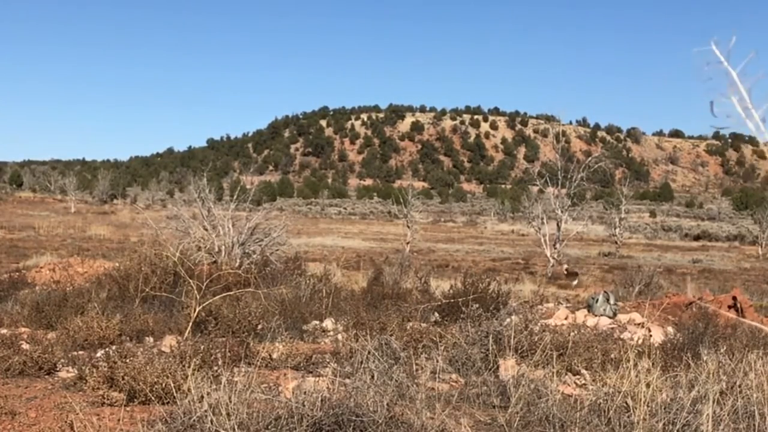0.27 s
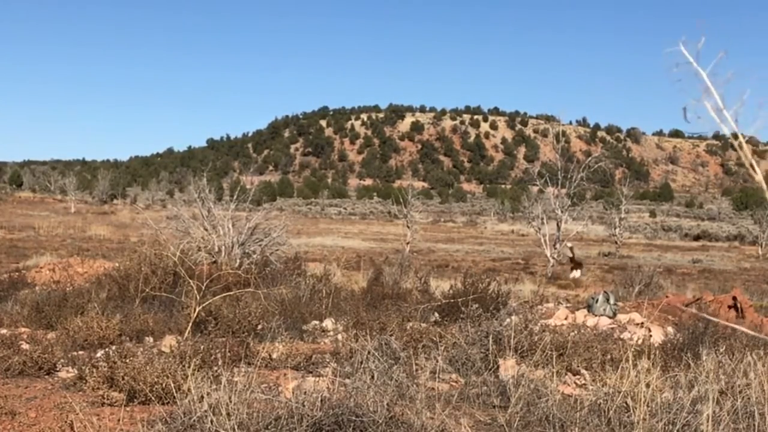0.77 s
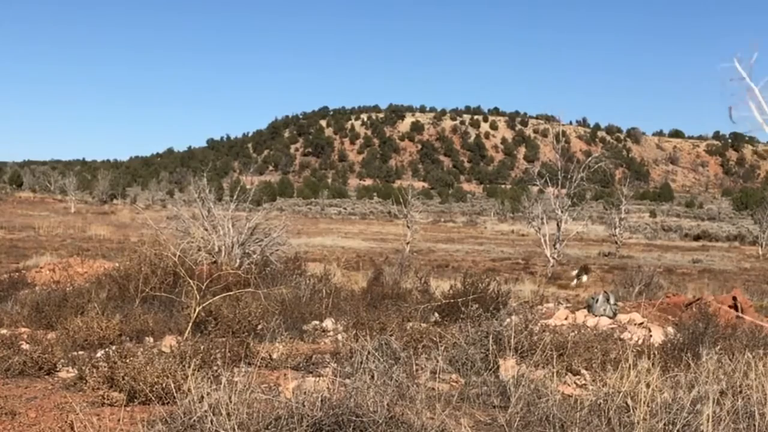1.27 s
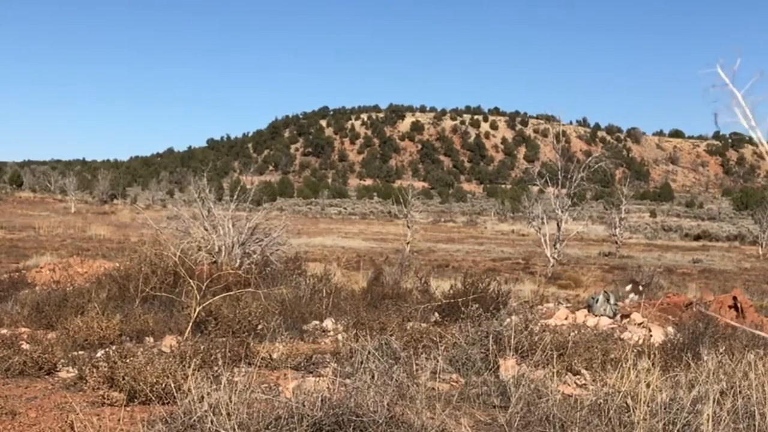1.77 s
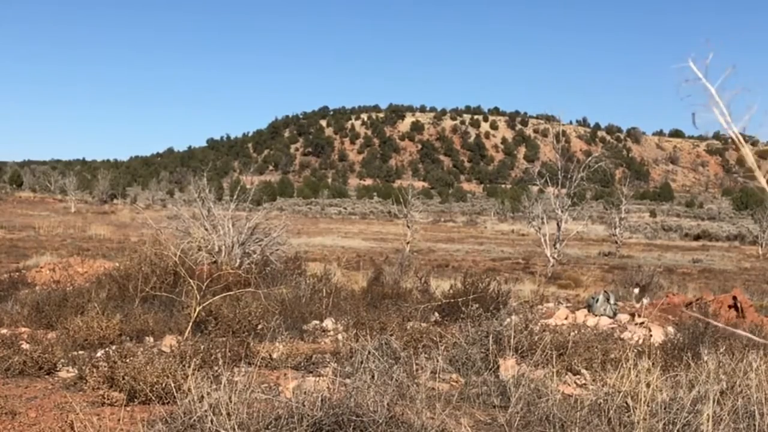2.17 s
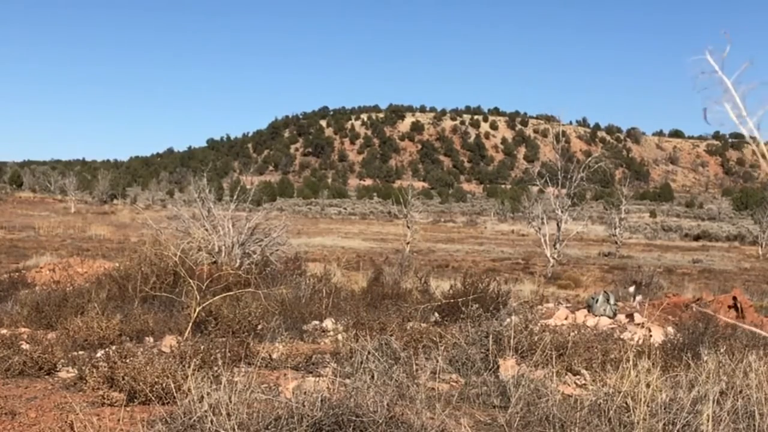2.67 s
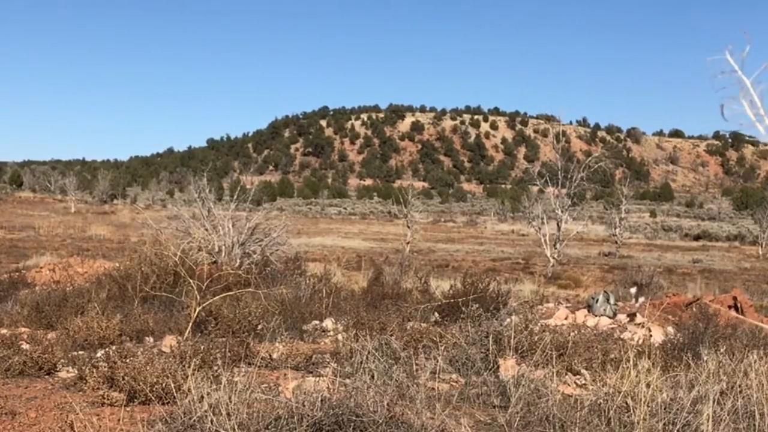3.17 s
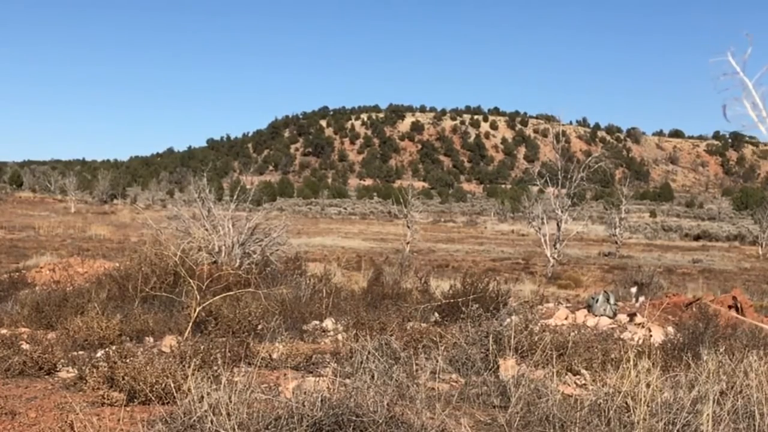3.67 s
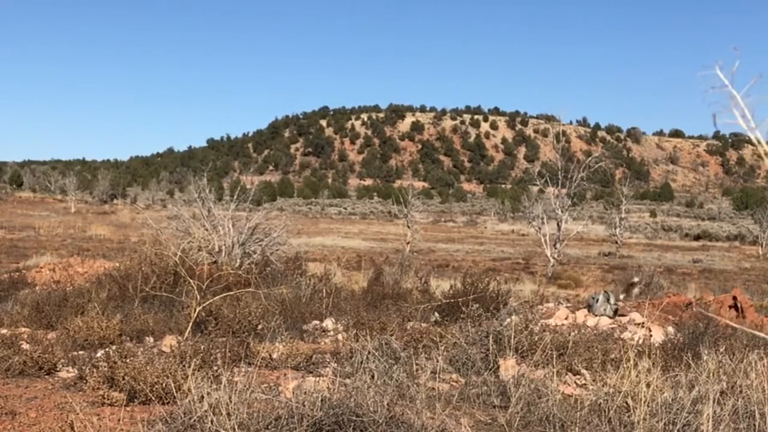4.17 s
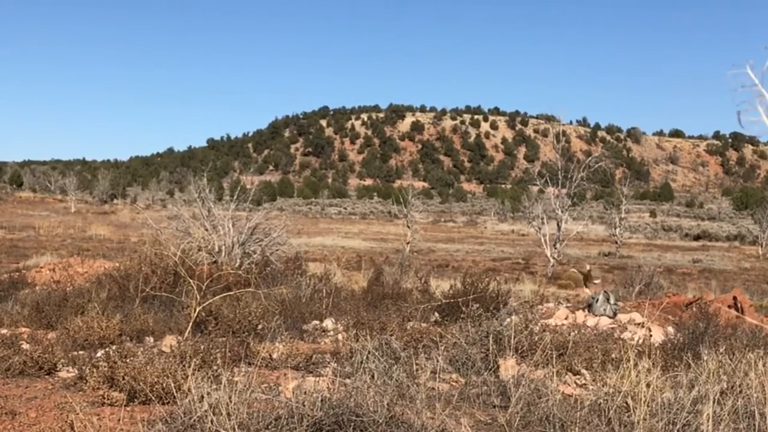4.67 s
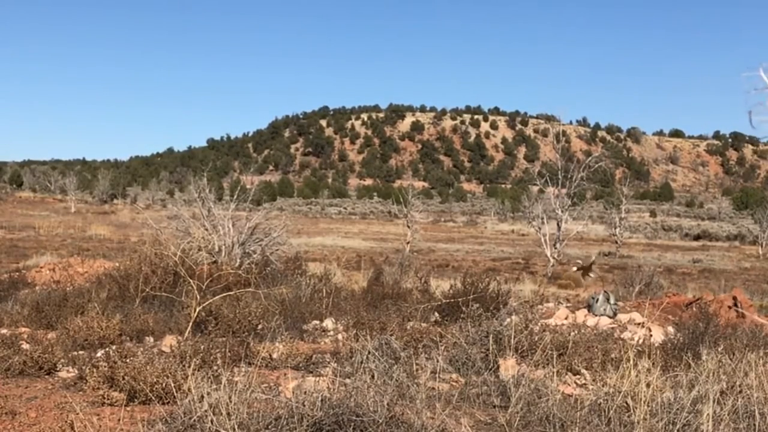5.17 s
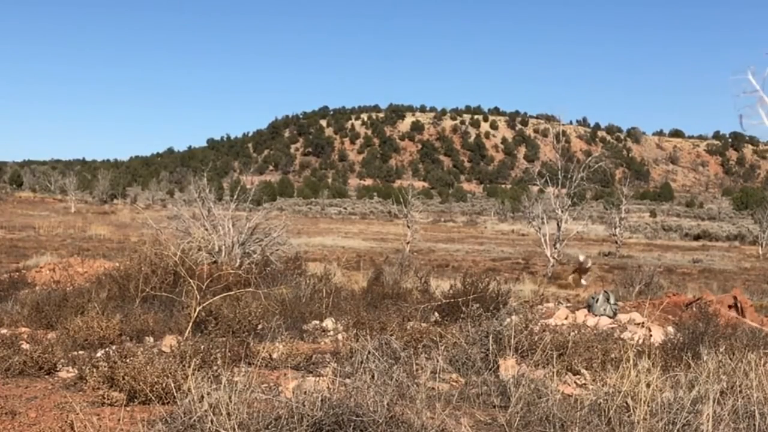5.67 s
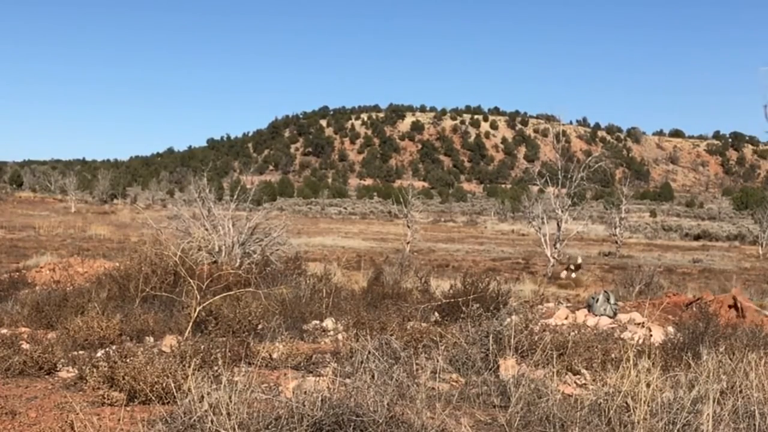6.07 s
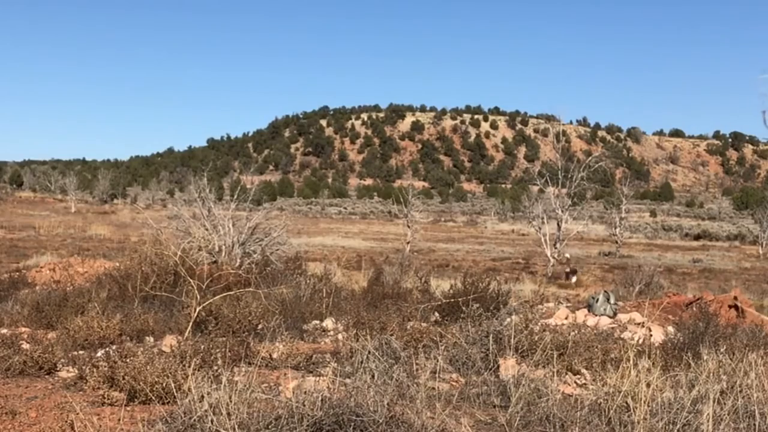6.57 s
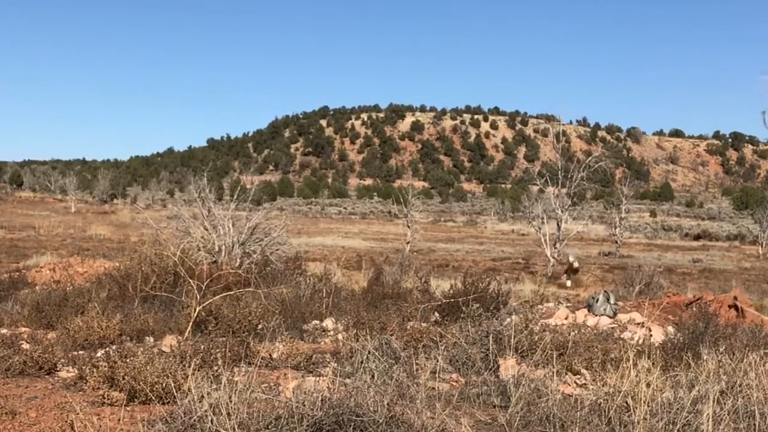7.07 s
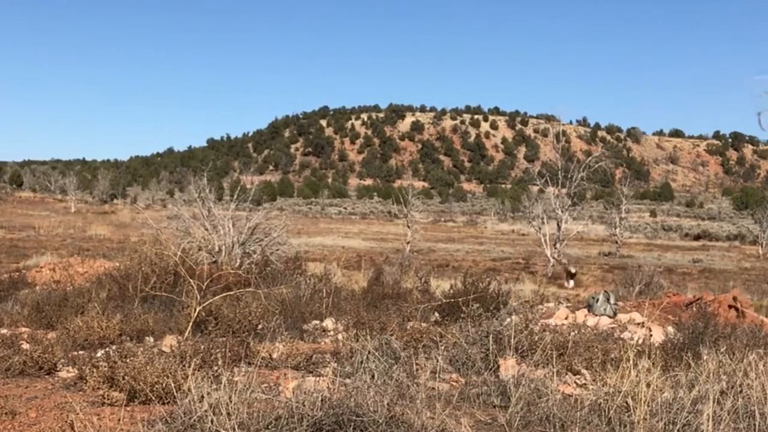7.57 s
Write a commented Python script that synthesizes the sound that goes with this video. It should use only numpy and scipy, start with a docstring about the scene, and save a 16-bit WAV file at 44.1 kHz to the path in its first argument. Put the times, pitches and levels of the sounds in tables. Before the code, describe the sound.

Coyotes bark roughly, yip and howl in open country while wind buffets the microphone.

```python
"""Open scrub with coyotes: one barks roughly and swells into three long howls, a second yips under it,
and others answer from far away. Their vocal folds make a clear note when they swing evenly and a
rough one when they flap unevenly. The sloping ground throws back a thin echo. Wind buffets the
microphone over a faint hiss, and something dry snaps right beside it."""
import sys
import numpy as np
from scipy import signal
from scipy.fft import rfft, irfft, next_fast_len
from scipy.io import wavfile
from scipy.ndimage import uniform_filter1d

SR = 44100
rng = np.random.default_rng(int(sys.argv[2]) if len(sys.argv) > 2 else 0)


def master(y):
    """Save y as 16-bit WAV."""
    cut = np.clip(np.atleast_2d(y).T, -1, 1)
    pcm = np.round(cut * 32767)  # scale
    wavfile.write(sys.argv[1], SR, pcm.astype(np.int16))


N = 345303
TIME = np.arange(N) / SR

# How a near and a far coyote's throat colour the voice: frequency_hz, gain_db
NEAR_THROAT = [(200, -41), (450, -28.5), (600, -12), (760, 12), (1050, 11), (1300, -2), (1600, 3.5),
               (1900, -14), (2250, -16), (2700, -31), (3350, -25.5), (4000, -47.5), (6700, -44),
               (10000, -69)]
DISTANT_THROAT = [(300, -37.5), (600, -7), (780, 9.5), (1100, -1.5), (1350, -14.5), (1650, -11),
                  (2200, -36.5), (3400, -33.5), (5000, -73), (9000, -45)]
# The tone of wind fluttering on the microphone: frequency_hz, gain_db
FLUTTER_COLOUR = [(60, -28.5), (110, 2.5), (150, 1), (220, -2.5), (320, -11), (450, -23.5), (700, -35),
                  (1200, -51.5), (3000, -84.5)]


def gain_of(db):
    """Turns decibels into a number to multiply by."""
    return 10 ** (np.asarray(db) / 20)


def evened(x):
    """Scales a signal to an average strength (rms) of 1."""
    return x / np.sqrt(np.mean(x ** 2) + 1e-20)


def read(points, hz):
    """Looks up a table's value at any frequency, on a log scale."""
    frequencies, values = np.transpose(points)
    return np.interp(np.log(hz + 1), np.log(frequencies + 1), values)


def follow(rows):
    """Turns timed rows into sample times and one curve for each other column."""
    times, *columns = np.transpose(rows)
    t = np.arange(times[0], times[-1], 1 / SR)
    return [t] + [np.interp(t, times, column) for column in columns]


def add(mix, start_s, sound):
    """Mixes a sound in at a given time."""
    part = mix[max(0, round(start_s * SR)):][:len(sound)]
    part += sound[:len(part)]


def coloured(x, colour):
    """Shapes a signal's lows and highs by a table, at strength 1."""
    size = next_fast_len(len(x))
    gains = gain_of(read(colour, np.fft.rfftfreq(size, 1 / SR)))
    return evened(irfft(rfft(x, size) * gains, size)[:len(x)])


def wander(t, rate_hz):
    """A smooth random wobble of strength 1, up to about the given rate."""
    size, coarse_sr = 2 ** 15, 4000
    hz = np.fft.rfftfreq(size, 1 / coarse_sr)
    slow = evened(irfft(rfft(rng.standard_normal(size)) / (1 + (hz / rate_hz) ** 4)))
    return np.interp(t * coarse_sr, np.arange(size), slow)


def fade(t, edge_s=0.0096):
    """A soft start and end for a sound."""
    return np.clip(np.minimum(t - t[0], t[-1] - t) / edge_s, 0, 1)


def around(peak_s, rise_s, fall_s):
    """A call's sample times and progress: -1 at the start, 0 at the peak, 1 at the end."""
    t = np.arange(peak_s - rise_s, peak_s + fall_s, 1 / SR)
    return t, (t - peak_s) / np.where(t < peak_s, rise_s, fall_s)


def noise(t):
    """White noise, one value for each sample time."""
    return rng.standard_normal(N)[:len(t)]


def eddies(colour, lumps=1):
    """The pressure of swirling air, held at an even strength."""
    pressure = coloured(noise(TIME) * lumps, colour)
    return pressure / np.sqrt(uniform_filter1d(pressure ** 2, size=3000))


def wind(flutter_db=-19, flutter_chop_db=4, chop_db=4.5, lumps_db=3):
    """Swirls push on the microphone; gusts swell over that push and break into lumpy flutter."""
    # The steady push: time_s, level_db
    steady_wind = [(0, -37), (.5, -40), (.9, -41.5), (1.3, -45.5), (1.65, -48), (2.3, -44), (3.1, -40),
                   (3.4, -45), (3.9, -48), (4.4, -43.5), (5, -46), (5.55, -49), (5.9, -57), (6.4, -55),
                   (6.9, -56.5), (7.3, -46), (7.5, -56), (7.83, -49)]
    # Gusts: peak_s, half_length_s, rumble_db, flutter_db
    gusts = [ (0.116, 0.027, -31.5, -38), (0.29, 0.044, -25, -23.5), (0.439, 0.077, -24.5, -38),
             (0.642, 0.019, -56, -39.5), (0.771, 0.0097, -52, -37), (0.95, 0.023, -29.5, -33),
             (1.051, 0.024, -26.5, -35.5), (1.769, 0.044, -43, -52.5), (2.218, 0.023, -23.5, -33),
             (2.38, 0.035, -35.5, -50), (2.566, 0.022, -36, -49), (2.927, 0.027, -35.5, -73),
             (4.061, 0.049, -38, -51.5), (4.205, .02, -30, -46.5), (4.481, 0.056, -29.5, -51.5),
             (4.784, 0.045, -24.5, -42), (5.45, 0.019, -32, -53.5), (6.058, 0.043, -35, -41.5),
             (6.594, 0.034, -42, -53.5), (7.03, 0.036, -27.5, -36), (7.146, 0.045, -29, -38.5), ]
    # The tone of the push, and of gusts, whose faster air sounds higher: frequency_hz, gain_db
    rumble_colour = [(10, -23), (25, -8), (45, 10), (70, 7.5), (115, -5), (150, -10.5), (250, -24),
                     (600, -77.5)]
    gust_colour = [(10, -36), (25, -20), (45, 3), (65, 4.5), (90, 6), (125, -1.5), (160, -9), (250, -30),
                   (600, -89.5)]
    push = gain_of(np.interp(TIME, *np.transpose(steady_wind)))
    shake = push * gain_of(flutter_db + flutter_chop_db * wander(TIME, 33))
    gusting = np.zeros(N)
    for peak_s, half_s, low_db, high_db in gusts:
        swell = np.exp(-np.minimum(((TIME - peak_s) / half_s) ** 2, 20))
        gusting += gain_of(low_db) * swell
        shake += gain_of(high_db) * swell
    rumble = eddies(rumble_colour) * gain_of(chop_db * wander(TIME, 36))  # single swirls chop it up
    flutter = eddies(FLUTTER_COLOUR, gain_of(lumps_db * wander(TIME, 44)))
    return push * rumble + gusting * eddies(gust_colour) + shake * flutter


def air_hiss(level_db=-67):
    """A faint, steady hiss behind everything."""
    # The tone of the hiss: frequency_hz, gain_db
    hiss_colour = [(180, -27), (300, -2), (511, -12), (700, -6), (898, -1), (1230, -9), (1380, -4),
                   (1480, -13), (1870, -19), (4290, -21), (4980, -23), (6280, -23), (10300, -26.5),
                   (11400, -24), (15900, -27.5)]
    return gain_of(level_db) * coloured(noise(TIME), hiss_colour)


def hoarse_voice(t, hz, level_db, rough, bright_db, throat, jitter, noisiness):
    """Vocal folds between a clear note (rough=0) and chaos (rough=1), heard through the throat."""
    wobble = 1 + (.006 + jitter * rough) * wander(t, 150)
    cycles = np.cumsum(uniform_filter1d(hz, size=400) * wobble) / SR
    # At high pitch the folds no longer close, and the overtones fade.
    falsetto = np.clip(np.log2(hz / 550), 0, 1)
    sizes = [gain_of(read(throat, k * hz) - 6 * falsetto * np.log2(k)) for k in range(1, 19)]
    folds = sum(size * np.cos(2 * np.pi * k * cycles + k * k) for k, size in enumerate(sizes, 1))
    folds /= np.sqrt(sum(size ** 2 for size in sizes) / 2)
    # Air escapes in one puff a cycle.
    puffs = coloured((0.17 + np.exp(-(cycles % 1) / 0.21)) * noise(t), throat)
    air_share = .01 + noisiness * rough ** 3
    voice = np.sqrt(1 - air_share) * folds + np.sqrt(air_share) * puffs
    # An open mouth lifts the bright part of the voice.
    mouth = signal.sosfiltfilt(signal.butter(3, [1250, 3700], "band", fs=SR, output="sos"), voice)
    voice += (gain_of(bright_db) - 1) * mouth
    voice /= np.sqrt(abs(uniform_filter1d(voice ** 2, size=900)) + 1e-9)  # even out the strength
    sputter_db = 3.8 * rough * wander(t, 58)  # rough folds also pulse unevenly
    return t[0], gain_of(level_db + sputter_db) * voice * fade(t)


def far_wail(bright_db_per_octave=22):
    """A long hoarse call far away; the mouth opens as the pitch climbs."""
    # The path of the wail: time_s, pitch_hz, level_db
    wail = [(0, 918, -50.5), (.1, 933, -55.5), (.2, 848, -52.5), (.39, 808.5, -63.5), (.47, 850, -37.5),
            (.53, 879, -40), (.59, 1100, -42), (.655, 1119, -50), (.71, 1011, -37.5), (.76, 889, -62),
            (.81, 852, -44.5), (.89, 772, -71)]
    t, hz, level_db = follow(wail)
    bright_db = bright_db_per_octave * np.log2(hz / hz.mean())
    return hoarse_voice(t, hz, level_db, rough=0.57, bright_db=bright_db,
                        throat=DISTANT_THROAT, jitter=.12, noisiness=.6)


def hillside_echo(calls, build_s=0.0031, bounce_db=-4):
    """The slope throws back a few clear bounces over a thin scatter from the scrub."""
    # How long the scatter takes to fall by 60 dB: frequency_hz, time_s
    ring_times = [(300, .4), (900, .7), (2200, .55), (5000, .3), (12000, .2)]
    # Single bounces off the slope: delay_s, relative_db
    bounces = [(.021, 2.5), (.047, -2), (.062, -4.5), (.093, -7.5), (.135, -24.5)]
    scatter = rng.standard_normal(SR) * (rng.random(SR) < .05) * (1 - np.exp(-TIME[:SR] / build_s))
    hz, t, bands = signal.stft(scatter, SR, nperseg=256)
    dying = gain_of(-60 * t / read(ring_times, hz)[:, None])
    tail = signal.istft(bands * dying, SR, nperseg=256)[1]
    tail /= np.linalg.norm(tail)
    for delay_s, level_db in bounces:
        tail[round(delay_s * SR)] += gain_of(level_db + bounce_db)
    return signal.fftconvolve(calls, tail / np.linalg.norm(tail))[:N]


def buffets(cutoff_hz=800):
    """Swirls of air hit the microphone's opening, each with a dull thump."""
    # Sudden hits of wind: start_s, level_db, decay_s
    hits = [(0.091, -32, 0.022), (0.236, -17, 0.026), (.412, -19.5, 0.0046), (2.209, -18, 0.0074),
            (4.762, -28, 0.019), (6.026, -38, 0.0091), (7.136, -38, 0.012)]
    out, t = np.zeros(N), TIME[:SR // 4]
    for start_s, level_db, decay_s in hits:
        swirl = coloured(rng.standard_normal(len(t)), FLUTTER_COLOUR)
        add(out, start_s, gain_of(level_db) * np.exp(-t / decay_s) * fade(t, edge_s=0.00032) * swirl)
    return signal.sosfilt(signal.butter(4, cutoff_hz, fs=SR, output="sos"), out)


def bark(row, throat, jitter, noisiness):
    """One push of air with rough ends; the clearer its peak, the more the pitch arches there."""
    peak_s, rise_s, fall_s, top_hz, level_db, top_rough, bright_db = row
    arch_s, arch_depth, clear_s = .043, .31, 0.04
    end_db, end_rough, shut_db = -22, 0.93, -15  # the ends are quiet, rough and dulled by the mouth
    t, progress = around(peak_s, rise_s, fall_s)
    off_arch = 1 - np.exp(-((t - peak_s) / arch_s) ** 2)
    hz = top_hz * (1 - arch_depth * np.sqrt(1 - top_rough) * off_arch)
    near_peak = np.exp(-((t - peak_s) / clear_s) ** 4)
    rough = end_rough + (top_rough - end_rough) * near_peak
    swell_db = level_db + end_db * abs(progress) ** 1.24
    mouth_db = bright_db + shut_db * progress ** 2
    return hoarse_voice(t, hz, swell_db, rough, mouth_db, throat, jitter, noisiness)


def far_barks():
    """Coyotes far away answer with dull, rough barks."""
    # Barks: peak_s, rise_s, fall_s, top_pitch_hz, level_db, peak_roughness (0-1), brightness_db
    calls = [ (.96, 0.049, 0.061, 411, -47, .9, 4.5), (1.15, 0.065, 0.11, 421, -64.5, .95, -9),
             (1.555, 0.088, 0.073, 508, -58, .8, 3), (1.775, .13, 0.069, 451, -58, .95, 9),
             (2.08, 0.088, 0.18, 389, -57, .9, 15.5), (7.21, .05, 0.29, 410, -56, .85, -5),
             (7.41, 0.071, 0.054, 334.2, -38.5, .7, -3), (7.55, 0.064, 0.11, 324, -58, .5, -29), ]
    out = np.zeros(N)
    for row in calls:
        add(out, *bark(row, DISTANT_THROAT, jitter=.09, noisiness=.5))
    return out


def near_barks():
    """Barks close by, louder and steadier in pitch."""
    # Barks: peak_s, rise_s, fall_s, top_pitch_hz, level_db, peak_roughness (0-1), brightness_db
    calls = [ (2.184, 0.069, 0.081, 422.2, -28.5, .25, 9), (2.754, .072, 0.075, 492.7, -23, 0.21, 8),
             (3.168, .024, 0.039, 518, -21.5, 0.86, -3.5), (3.206, .045, 0.018, 477.7, -18.5, 0.16, -2),
             (3.229, 0.076, 0.071, 1087, -16, 0.11, 4), (3.28, 0.033, 0.038, 400.5, -34, 1, 3),
             (4.133, 0.041, .06, 376.6, -32.5, 1, -13), (5.44, 0.017, 0.042, 409.5, -34, .4, 11),
             (6.425, 0.049, .16, 397, -29, 0.68, 17.5), (6.855, .075, 0.07, 380, -37, 0.32, 1.5),
             (6.925, .04, 0.06, 790, -20.5, 0, -2.5), (6.94, 0.044, 0.14, 423, -25.5, 0.7, 6.5),
             (6.966, .035, 0.088, 877.5, -29, 0.1, 18), (7.64, 0.063, 0.048, 800, -27, 0.6, -16), ]
    out = np.zeros(N)
    for row in calls:
        add(out, *bark(row, NEAR_THROAT, jitter=.04, noisiness=.7))
    return out


def dry_snaps(scatter_db=-23, scatter_s=0.029, tail_db=-38, tail_s=0.072):
    """Short bright cracks, each scattered by the brush close by."""
    # Snaps and ticks: start_s, level_db, decay_s
    snaps = [(2.357, -60.5, 0.006), (2.864, -64, .008), (2.869, -25.5, 0.0022), (2.878, -25.5, 0.0095),
             (2.887, -18, 0.0029), (3.068, -61.5, 0.0017), (3.389, -60.5, 0.0039)]
    # The tone of a snap: frequency_hz, gain_db
    snap_colour = [(240, -3.5), (400, -15), (764, -14), (1310, -12), (1810, -14.5), (2080, -25.5),
                   (2970, -11.5), (3630, -12), (3860, -4.5), (4360, -3.5), (6130, -21.5), (6930, -19),
                   (9150, -21.5), (10200, -16), (15900, -40.5)]
    out, t = np.zeros(N), TIME[:SR // 2]
    scatter = gain_of(scatter_db) * np.exp(-t / scatter_s) + gain_of(tail_db) * np.exp(-t / tail_s)
    for start_s, level_db, decay_s in snaps:
        shape = (np.exp(-t / decay_s) + scatter) * fade(t, edge_s=0.0014)
        crack = coloured(rng.standard_normal(len(t)), snap_colour)
        add(out, start_s, gain_of(level_db) * shape * crack)
    return out


def howls(jitter=0.0018, leap_jitter=0.029, breath_db=-38, leap_breath_db=-14, settle_s=0.08):
    """Nearly pure notes, rough where the pitch leaps; overtones come and go as the head turns."""
    # One list a howl: time_s, pitch_hz, main_note_db, octave_above_db, upper_overtones_db
    calls = [
        [(3.3, 867, -35, -46, -85.5), (3.332, 1002, -33, -57.5, -77.5), (3.394, 1035, -38.5, -51, -87.5),
         (3.616, 1001, -43, -60, -97.5), (3.638, 1034, -36.5, -34, -63.5), (3.66, 1020, -31, -35.5, -91),
         (3.676, 1047, -37, -66, -85), (3.69, 1022, -51.5, -52, -85), (3.768, 1090, -41, -53.5, -87),
         (3.814, 1246, -39, -59.5, -76), (3.872, 1237, -45.5, -51, -75.5), (3.928, 1224, -47, -51.5, -69.5),
         (4.08, 1237, -55, -53, -77.5), (4.14, 1173, -43, -47.5, -67), (4.2, 1173, -39, -53.5, -74.5),
         (4.256, 1151, -38, -56.5, -83.5), (4.275, 1144, -56, -65, -114)],
        [(4.462, 1032, -40, -79.5, -102), (4.474, 1006, -33.5, -70.5, -97.5), (4.502, 1226, -34, -52, -99),
         (4.52, 1275, -19.5, -62.5, -78), (4.554, 1343, -29, -56.5, -70), (4.736, 1195, -34, -47.5, -85.5),
         (4.866, 1186, -36, -46, -80), (4.936, 1108, -33.5, -50.5, -70), (4.948, 1107, -31.5, -62.5, -69.5),
         (5.006, 1019, -29, -45.5, -77.5), (5.058, 1021, -27, -44, -78.5), (5.074, 930, -29, -48, -103),
         (5.095, 874, -69.5, -49, -90)],
        [(5.435, 799, -41.5, -59.5, -100), (5.453, 952, -25.5, -49.5, -87), (5.469, 1130, -36, -45.5, -75.5),
         (5.505, 1327, -24, -58.5, -67.5), (5.655, 1260, -38, -80, -96), (5.735, 1202, -44, -70, -99),
         (5.771, 1141, -35, -49.5, -75), (5.943, 1071, -34.5, -43, -80), (5.963, 1072, -32.5, -52, -87.5),
         (5.985, 1029, -31.5, -45.5, -73.5), (6.083, 1018, -30.5, -37, -73), (6.115, 978, -31, -49, -99),
         (6.205, 943.5, -29.5, -40.5, -85.5), (6.277, 922.4, -25.5, -44, -87.5),
         (6.365, 951, -26.5, -40.5, -81), (6.433, 957, -28.5, -47, -89), (6.511, 888, -23.5, -47, -78),
         (6.573, 826, -31.5, -41.5, -94.5), (6.6, 740, -47, -67, -109)],
    ]
    # The tone of the upper overtones: frequency_hz, gain_db
    overtone_colour = [(2800, 6.5), (3500, 3.5), (3750, 7.5), (3950, -8.5), (4300, 8.5), (4800, 2),
                       (5600, -9.5), (6600, -3.5), (8000, -19.5), (9600, -6.5), (11000, -28.5)]
    out = np.zeros(N)
    for rows in calls:
        t, hz, main_db, octave_db, upper_db = follow(rows)
        hz = uniform_filter1d(hz, size=700)
        octaves_per_s = uniform_filter1d(abs(np.gradient(np.log2(hz))) * SR, size=2000)
        leap = np.clip(octaves_per_s / 9, 0, 1)
        calm = np.exp(-(t - t[0]) / settle_s)  # after a leap the folds take a moment to settle
        leap = np.maximum.accumulate(leap / calm) * calm
        hz *= 1 + (jitter + leap_jitter * leap) * wander(t, 130) + 0.001 * wander(t, 33)
        phase = 2 * np.pi * np.cumsum(hz) / SR
        tone = gain_of(main_db + 1.5 * wander(t, 32)) * np.sin(phase)
        tone += gain_of(octave_db + 3 * wander(t, 42)) * np.sin(2 * phase)
        for k in range(3, 10):
            colour_db = read(overtone_colour, k * hz) - 9 * np.log2(k / 4) - 2
            tone += gain_of(upper_db + colour_db + 3.5 * wander(t, 25)) * np.sin(k * phase)
        breathiness = gain_of(breath_db) + gain_of(leap_breath_db) * leap ** 2
        breath = gain_of(main_db) * breathiness * coloured(noise(t), NEAR_THROAT)
        add(out, t[0], (np.sqrt(2) * tone + breath) * fade(t))
    return out


def rasp(boost_db=1, grain_db=3):
    """The vocal folds flap unevenly under the first howl."""
    # How the rasp rises and falls: time_s, level_db
    loudness = [(3.3, -42.5), (3.346, -54), (3.376, -40), (3.634, -43), (3.79, -50.5), (3.814, -68.5),
                (4.084, -59.5), (4.1, -65)]
    # The tone of the rasp: frequency_hz, gain_db
    rasp_colour = [(400, -50), (600, 0.5), (780, 20.5), (900, 7), (1200, -7.5), (1700, -16), (2600, -33.5),
                   (4000, -33.5), (8000, -66)]
    t, level_db = follow(loudness)
    air = coloured(noise(t) * gain_of(grain_db * wander(t, 90)), rasp_colour)
    return t[0], gain_of(level_db + boost_db) * air * fade(t, edge_s=0.0087)


def yips(scoop=0.17, jitter=0.0084, breath_db=-24, end_breath_db=-15):
    """Thin whines that scoop up, then drop and turn breathy, swelling where the throat rings."""
    # The second coyote's yips: top_s, rise_s, fall_s, top_pitch_hz, end_pitch_hz, level_db
    calls = [ (4.3, 0.033, 0.082, 1540, 900, -48.5), (4.625, 0.016, 0.055, 1220, 687, -48.5),
             (4.885, 0.04, .105, 1086, 708, -49), (5.225, 0.072, 0.067, 1116, 723, -48),
             (5.525, 0.043, 0.066, 937, 703, -53.5), (5.845, 0.078, 0.049, 886, 670, -49.5),
             (6.095, 0.029, 0.11, 895, 690, -52), (6.735, 0.07, 0.1, 1280, 740, -47),
             (6.745, 0.012, 0.049, 1060, 700, -60.5), (6.922, 0.082, 0.035, 1540, 1410, -48),
             (7.085, .03, 0.13, 1120, 668, -56.5), ]
    # Overtones next to the main note: frequency_hz, gain_db
    overtones = [(1400, -22), (1650, -24), (1850, -31), (2100, -39), (2600, -53), (3300, -39.5),
                 (4500, -54.5)]
    # How much the throat lifts each pitch: pitch_hz, gain_db
    throat_lift = [(680, -2), (765, 18), (830, 17.5), (900, 9), (1000, 5), (1120, -5), (1300, -0.5),
                   (1550, 5.5)]
    out = np.zeros(N)
    for top_s, rise_s, fall_s, top_hz, end_hz, level_db in calls:
        t, progress = around(top_s, rise_s, fall_s)
        rising_hz = top_hz * (1 - scoop * progress ** 2)
        falling_hz = top_hz - (top_hz - end_hz) * abs(progress) ** 1.3
        hz = np.where(progress < 0, rising_hz, falling_hz)
        phase = 2 * np.pi * np.cumsum(hz * (1 + jitter * wander(t, 130))) / SR
        tone = np.sin(phase) + sum(gain_of(read(overtones, k * hz)) * np.sin(k * phase) for k in (2, 3))
        breathiness = gain_of(breath_db) + gain_of(end_breath_db) * np.maximum(progress, 0) ** 2
        breath = breathiness * coloured(noise(t), NEAR_THROAT)
        swell_db = read(throat_lift, np.where(progress < 0, top_hz, hz))
        loudness = gain_of(level_db + swell_db + 0.81 * wander(t, 40))
        add(out, t[0], loudness * (np.sqrt(2) * tone + breath) * fade(t))
    return out


def scene():
    """Near and far coyotes with their echoes, in wind and faint hiss."""
    howling, barking, yipping, far = howls(), near_barks(), yips(), far_barks()
    add(far, *far_wail())
    add(barking, *rasp())
    direct = gain_of(1.5) * howling + gain_of(-0.72) * barking + gain_of(-2) * yipping + far
    near_to_slope = gain_of(-27) * howling + gain_of(-24) * barking + gain_of(-22) * yipping
    echo = hillside_echo(near_to_slope + gain_of(-11) * far)
    return (direct + echo + air_hiss() + dry_snaps() + wind() + buffets())[None]


def record(dry, cutoff_hz=15900):
    """Cuts off the very highest treble."""
    low_pass = signal.firwin(511, cutoff_hz, window=("kaiser", 9), fs=SR)
    return signal.oaconvolve(dry, low_pass[None], "same")


dry = scene()
out = record(dry)
master(out)
```